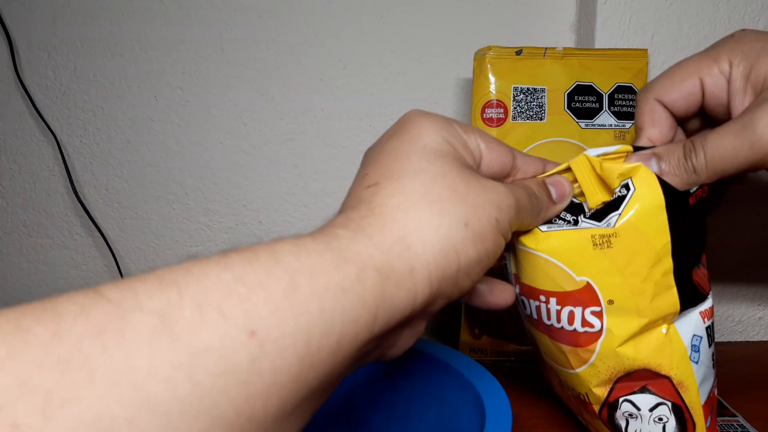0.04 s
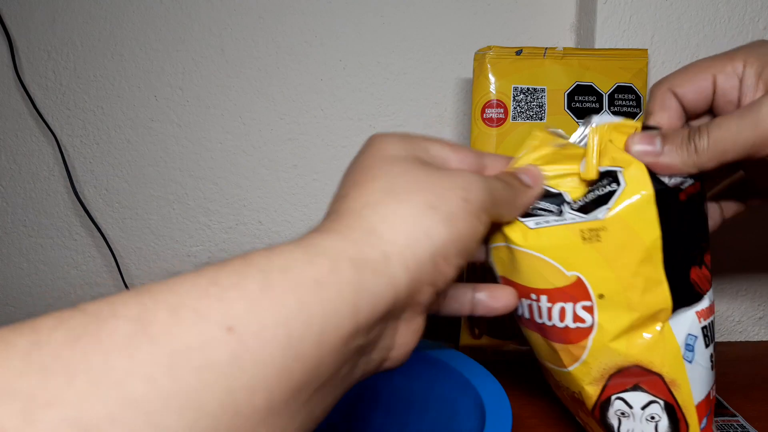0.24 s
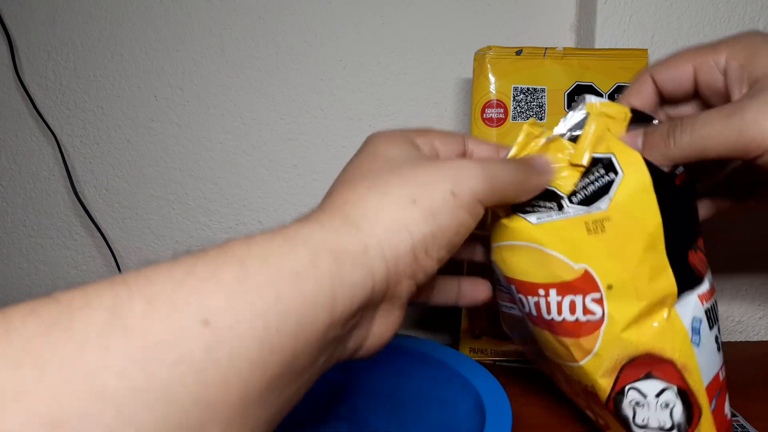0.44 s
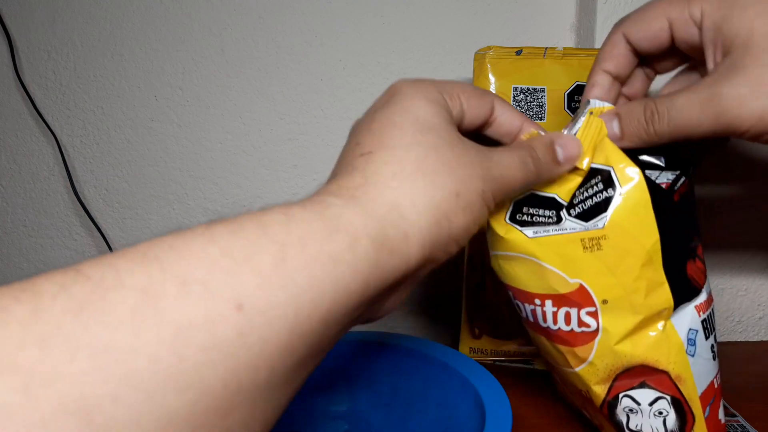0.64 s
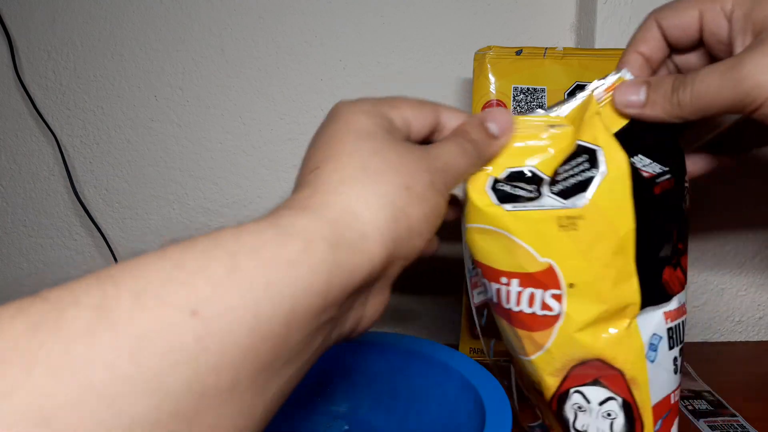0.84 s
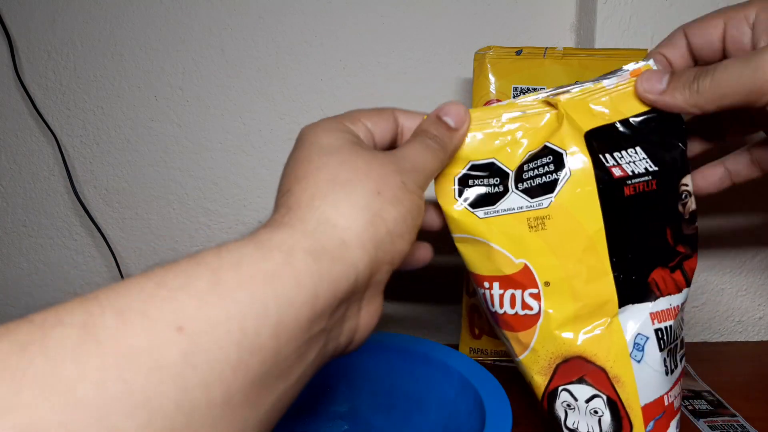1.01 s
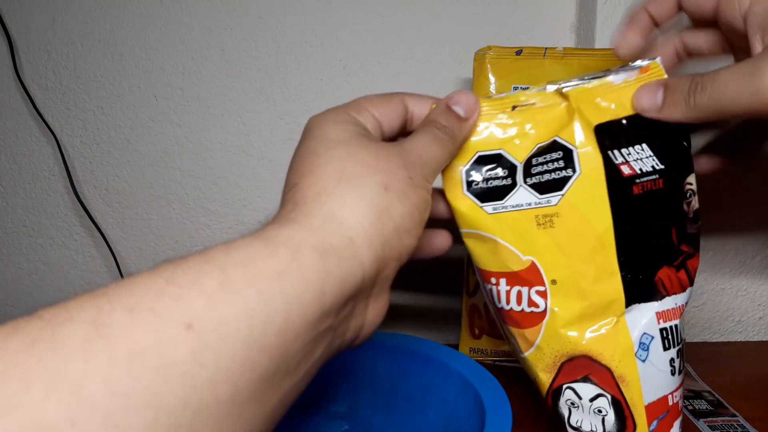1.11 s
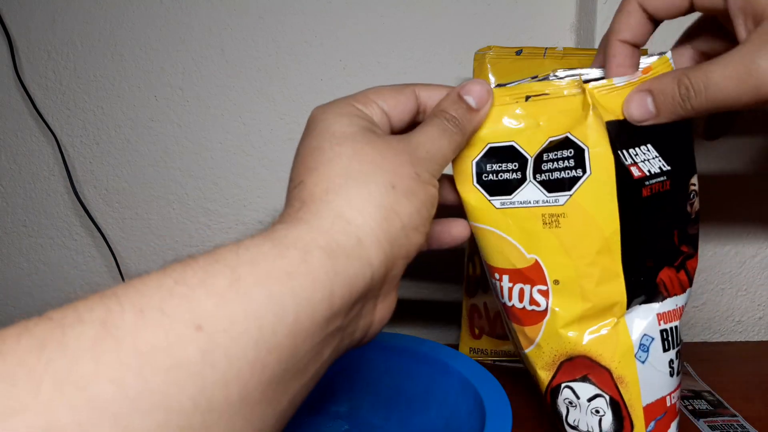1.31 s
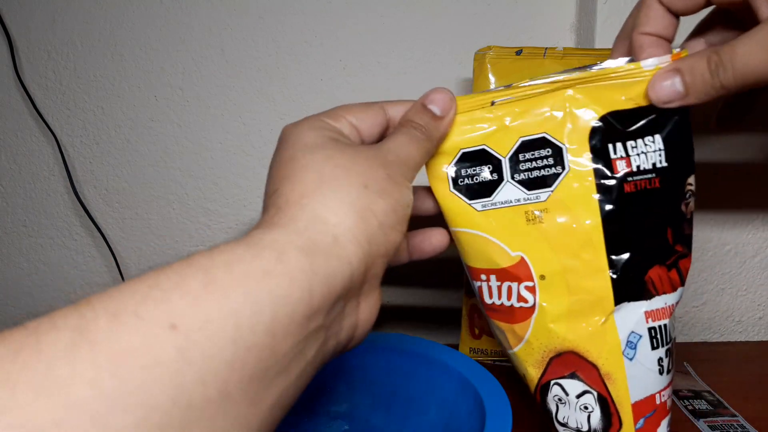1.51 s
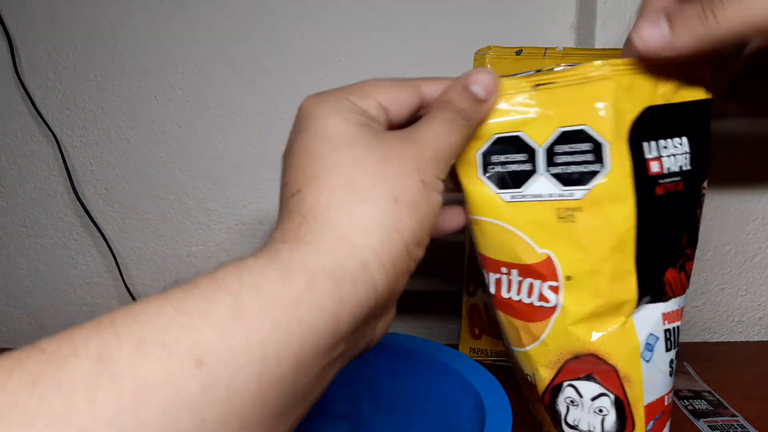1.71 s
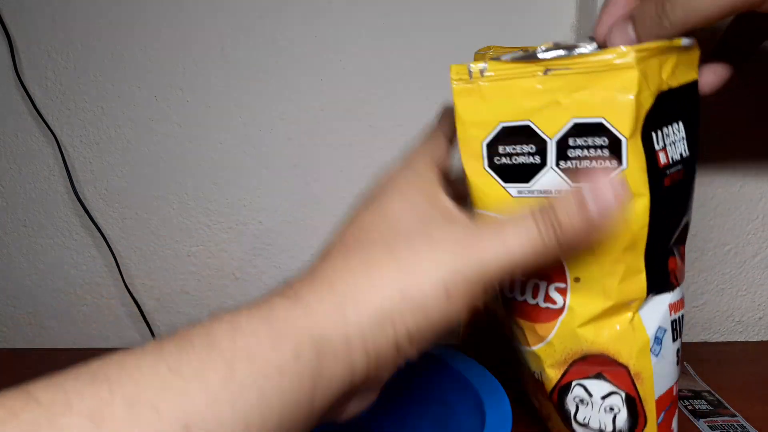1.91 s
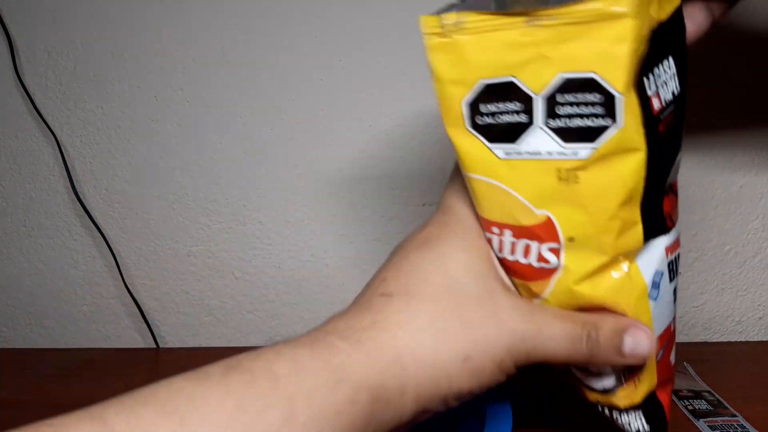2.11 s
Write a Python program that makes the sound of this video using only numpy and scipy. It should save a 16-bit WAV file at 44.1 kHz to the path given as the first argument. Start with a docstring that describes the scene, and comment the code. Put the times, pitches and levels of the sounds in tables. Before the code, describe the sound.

A foil snack bag is pulled open by hand, close and dry in a small room. A brief soft rip with a dull thump comes at 0.1 seconds, then a dense, loud hissing rip at 0.3. Crinkles and hollow pops follow until a crackling rip with bright snaps at 0.8-1.05. Quieter rustling leads to sharp snaps near 1.5 and 2.0, over faint low rumble.

```python
"""Three dense, hissing rips, bright snaps and hollow pops: two hands pull open a foil snack bag close by, in a
small room. The peeling seam is a stream of tiny clicks that ring the film; creases, cracks and popping panels
are short bursts of gritty noise, and crumpling is decaying noise grains. Dull puffs of air are dying sine
tones; a low rumble of filtered noise from the shifting hands lies underneath."""
import sys
import numpy as np
from scipy import signal
from scipy.fft import rfft, irfft
from scipy.io import wavfile

SR = 44100
rng = np.random.default_rng(int(sys.argv[2]) if len(sys.argv) > 2 else 0)


def pcm_store(signal):
    """Save signal as 16-bit PCM."""
    levels = np.round(np.clip(np.atleast_2d(signal), -1, 1) * 32767)
    wavfile.write(sys.argv[1], SR, levels.astype(np.int16).T)


N = 94815
TIME = np.arange(N) / SR

# Spectrum of snapping film: (frequency [Hz], relative level [dB])
FILM_SPECTRUM = [(300, -37), (1200, -6), (1900, -15.5), (2700, -8.5), (3400, 1.6), (5400, 1.5), (7000, 3),
                 (8500, 0.5), (10500, -2.5), (13000, -2), (16000, -8)]
# Spectrum of the hollow body of the bag: (frequency [Hz], relative level [dB])
BODY_SPECTRUM = [(60, -7), (185, -2.5), (310, 2.5), (420, -1), (540, 3), (640, -3.5), (760, 0.5),
                 (1020, -6.5), (1350, -1), (1900, -12), (3000, -9), (8000, -47)]
BODY_RISE_S = 0.0005


def from_db(db):
    """Decibels to gain."""
    return 10 ** (np.asarray(db) / 20)


def rms_one(x):
    """Scale to unit rms."""
    return x / np.sqrt(np.mean(x ** 2) + 1e-20)


def unit_snap(x):
    """Scale a burst so that its energy equals unit rms over 5 ms."""
    span_s = 0.005
    return x / np.sqrt(np.sum(x ** 2) / (span_s * SR))


def add(out, s, sound):
    """Mix a sound in at a time in seconds."""
    start = max(int(s * SR), 0)
    out[start:start + len(sound)] += sound[:max(N - start, 0)]


def colour(x, spectrum, tilt_db=0, size=2048):
    """Causal (minimum-phase) filter with the given spectrum, tilted in dB per octave."""
    tilt_pivot_hz = 5000
    hz, db = np.transpose(spectrum)
    f = np.maximum(np.arange(size // 2 + 1) * SR / size, 1)
    # The tilt levels off one octave below the pivot and two above
    octaves = np.clip(np.log2(f / tilt_pivot_hz), -1, 2)
    level = np.interp(np.log(f), np.log(hz), db) + tilt_db * octaves
    # Folding the cepstrum onto positive time makes the filter minimum-phase
    cepstrum = irfft(np.log(from_db(level)))[:size // 2]
    cepstrum[1:] *= 2
    impulse = irfft(np.exp(rfft(cepstrum, size)))
    return signal.fftconvolve(x, impulse)[:len(x)]


def even(x, span_s):
    """Hold the short-term rms near one, using a smooth window twice the span long."""
    window = signal.windows.hann(int(2 * span_s * SR) + 1)
    power = signal.fftconvolve(x ** 2, window / window.sum(), "same")
    return x / np.sqrt(np.abs(power) + 1e-12)


def resonance(x, hz, width_hz):
    """A two-pole band-pass with a gain of about one at its centre."""
    r = np.exp(-np.pi * width_hz / SR)
    zeros = (1 - r * r) / 2 * np.array([1, 0, -1])
    poles = [1, -2 * r * np.cos(2 * np.pi * hz / SR), r * r]
    return signal.lfilter(zeros, poles, x)


def clicks(per_s, spread_db):
    """Random clicks, mostly small, a few larger, by an exponential spread in dB."""
    sizes = from_db(spread_db * np.minimum(rng.exponential(1, N), 5))
    return sizes * (rng.random(N) < per_s / SR)


def grains(per_s, spread_db, decay_s):
    """Random tiny buckles, each a brief dying flutter of the film."""
    keep = np.exp(-1 / (decay_s * SR))
    envelope = signal.lfilter([1], [1, -keep], clicks(per_s, spread_db) + 1e-9)
    return envelope * rng.standard_normal(N)


def flutter(rise_s, decay_s, size=2048):
    """The gritty, quickly dying shudder of one buckle."""
    grit_spread = 0.43
    t = np.arange(size) / SR
    # The noise jumps to a new random loudness every 16 samples
    loudness = np.exp(grit_spread * np.repeat(rng.standard_normal(size // 16), 16))
    grit = rng.standard_normal(size) * loudness
    return grit * (1 - np.exp(-t / rise_s)) * np.exp(-t / decay_s)


def facets(count=48):
    """Breaks land on facets of every size, each ringing briefly at its own pitch."""
    per_s, spread_db, width_hz = 1200, 1.5, 94
    breaks = clicks(per_s, spread_db) * rng.choice([-1, 1], N)
    dealt = rng.integers(0, count, N)
    pitches_hz = np.linspace(2400, 12000, count) * rng.uniform(.98, 1.02, count)
    return sum(resonance(breaks * (dealt == k) + 1e-18, hz, width_hz) for k, hz in enumerate(pitches_hz))


def tearing(spectrum):
    """A dense stream of tiny breaks with ringing facets among them, held near unit level."""
    per_s, spread_db, even_s = 9000, 2.5, 0.016
    facet_db = -2.5  # relative to the breaks, before colouring
    breaks = clicks(per_s, spread_db) * rng.choice([-1, 1], N)
    mix = rms_one(breaks) + from_db(facet_db) * rms_one(facets())
    return even(colour(mix, spectrum), even_s)


def seam():
    """The glue lets go in thousands of tiny breaks a second, which ring the film and hiss on top."""
    # The seam peels, one curve per rip: (time [s], level [dB], top hiss relative to level [dB])
    rips = [
        [(.085, -58, -13), (.104, -36.5, -0.5), (.13, -37.5, -1.5), (.16, -35.5, 2), (.185, -41.5, 1),
         (.205, -58, 14)],
        [(.26, -47, 0), (.283, -31, 4), (.31, -23.5, -3.5), (.325, -22.5, 2.5), (.346, -28, 9), (.354, -33, 11),
         (.362, -41, -7)],
        [(.80, -49, -1), (.822, -36, -2), (.85, -54, 0), (.89, -40.5, -2), (.925, -30.5, 0.5),
         (.955, -28.5, -9.5), (.98, -34.5, 2.5), (1.036, -36, -12), (1.062, -48, -12)],
    ]
    # Spectrum of the peeling seam: (frequency [Hz], relative level [dB])
    seam_spectrum = [(300, -19), (1300, -6.5), (1900, -10), (2800, -6), (3350, -0.3), (5200, -4.5),
                     (7000, -0.5), (8500, -6), (10500, -17), (16000, -27)]
    # Spectrum of its top hiss: (frequency [Hz], relative level [dB])
    hiss_spectrum = [(2000, -23.5), (7000, -8), (10400, 0), (11800, -5), (13500, -0.5), (16000, -4)]
    ring, hiss = tearing(seam_spectrum), tearing(hiss_spectrum)
    out = np.zeros(N)
    for rip in rips:
        s, db, hiss_db = np.transpose(rip)
        gain = from_db(np.interp(TIME, s, db, -np.inf, -np.inf))  # silent outside the rip
        hiss_gain = from_db(np.interp(TIME, s, hiss_db))
        out += gain * (ring + hiss_gain * hiss)
    return out


def cracks():
    """A stretched facet of film flips with a sharp crack and rings at its own pitch."""
    # Taut film lets go: (time [s], level [dB], ring pitch [Hz])
    crack_table = [(0.1134, -25, 3300), (0.2913, -22.5, 3580), (.396, -35, 3420), (.471, -37, 6200),
                   (0.8728, -32, 7000), (0.8945, -22.5, 6500), (0.9197, -21, 7200), (0.949, -24.5, 7850),
                   (0.965, -22.5, 5860), (1.4511, -32.5, 6300), (1.571, -43, 3400), (1.676, -44.5, 3300),
                   (1.727, -42, 6670), (1.778, -43, 6650), (1.999, -37, 7800), (2.002, -21.5, 4920),
                   (2.0028, -24.5, 7900), (2.007, -35, 5170), (2.0126, -23, 7770), (2.082, -33.5, 5270)]
    rise_s, decay_s, tilt_db_per_octave = 0.00004, 0.0032, -3
    ring_db, ring_width_hz = 11, 640
    out = np.zeros(N)
    for s, db, hz in crack_table:
        film = colour(flutter(rise_s, decay_s), FILM_SPECTRUM, tilt_db_per_octave)
        ring = from_db(ring_db) * resonance(film, hz, ring_width_hz)
        add(out, s, from_db(db) * unit_snap(film + ring))
    return out


def snaps():
    """Each crease gives a bright snap and a slower, hollow knock of the whole bag."""
    # A crease snaps: (time [s], level before trims [dB], hollow body relative to level, before
    # its trim [dB], brightness tilt [dB per octave])
    snap_table = [(.031, -38.5, -1.5, -5), (0.2229, -35, -5, -15.5), (.250, -37.5, -11, 5),
                  (0.265, -30.5, -7, 1), (0.3694, -36, 0, -26), (.433, -30, -1.5, 3), (.486, -34, -21, 8),
                  (0.557, -37, 2.5, 8), (0.608, -39, 0, -5.5), (.630, -43, 8.5, -6.5),
                  (.672, -42, -19, 1.5), (0.7019, -39.5, 3.5, -7), (0.75, -35, -4, -5),
                  (0.7825, -34, -5, -9), (0.8139, -27.5, -4, -5.5), (0.853, -33, -11, 2.5),
                  (0.909, -25.5, -13, -5), (1.034, -27, -14, -5.5), (1.108, -39, -4, -7),
                  (1.205, -41.5, -15, -2.5), (1.2348, -33.5, -1, -6.5), (1.361, -44, 0.5, -5),
                  (1.383, -52.5, 9.5, -9), (1.3989, -39, 3, -5.5), (1.414, -47, -4, -17),
                  (1.4455, -36, -3, -7.5), (1.483, -33.5, -9, -8.5), (1.4919, -37, -2, -1),
                  (1.5141, -19, -22, -4.5), (1.544, -34, -3.5, -4.5), (1.6092, -28.5, -14, -1.5),
                  (1.85, -38, -7, -1.5), (1.911, -40.5, -5, 1), (1.9341, -40.5, -9, -1),
                  (2.0194, -40.5, 2, 7), (2.033, -39.5, -3, -11), (2.11, -35, -6.5, -10.5),
                  (2.138, -43.5, -14, -8)]
    rise_s, soft_decay_s, body_decay_s = 0.0005, 0.0037, 0.008
    snap_trim_db, body_trim_db = 0.5, 1
    # Harder snaps die sooner: the decay shrinks by a share of their excess level
    soft_snap_db, quickening = -35, 0.19
    out = np.zeros(N)
    for s, db, body_db, tilt_db in snap_table:
        decay_s = soft_decay_s * from_db(quickening * min(soft_snap_db - db, 0))
        snap = unit_snap(colour(flutter(rise_s, decay_s), FILM_SPECTRUM, tilt_db))
        knock = unit_snap(colour(flutter(BODY_RISE_S, body_decay_s), BODY_SPECTRUM))
        add(out, s, from_db(db + snap_trim_db) * snap)
        add(out, s, from_db(db + body_db + body_trim_db) * knock)
    return out


def pops():
    """Short, dry, hollow pops; the larger the panel, the lower its note."""
    # A panel of the bag wall pops through: (time [s], level [dB], pitch [Hz])
    pop_table = [(.291, -32, 680), (.436, -36, 560), (.5, -35, 327), (.515, -35, 580), (.633, -40.5, 1340),
                 (.702, -37.5, 1480), (.774, -32.5, 456), (.806, -32.5, 1210), (1.145, -39, 750),
                 (1.171, -41, 1410), (1.515, -34.5, 770), (1.69, -42, 725), (2.11, -38, 387),
                 (2.119, -39.5, 1300)]
    decay_s = 0.0037
    width_hz = 310  # of each of the two band-passes in a row
    out = np.zeros(N)
    for s, db, hz in pop_table:
        pop = resonance(flutter(BODY_RISE_S, decay_s), hz, width_hz)
        pop = resonance(pop, hz, width_hz)
        add(out, s, from_db(db) * unit_snap(pop))
    return out


def handling():
    """Fingers work the bag: fine crinkles in the film, hollow crumpling of its walls."""
    # Handling of the bag: (time [s], fine crinkle level [dB], hollow crumple level [dB])
    handling_curve = [(0, -48.5, -49), (.055, -57.5, -58), (.10, -37, -41.5), (.21, -52.5, -52.5),
                      (.255, -40.5, -44.5), (.29, -37, -34.5), (.345, -34.5, -36), (.40, -36.5, -47),
                      (.47, -41, -42), (0.521, -35, -40.5), (.60, -53.5, -62), (0.734, -57.5, -54),
                      (0.768, -41, -42), (.83, -42, -40), (.88, -46.5, -45), (1.002, -37.5, -33),
                      (1.09, -49, -50.5), (1.19, -57.5, -51.5), (1.32, -63.5, -57), (1.50, -50.5, -47.5),
                      (1.535, -42.5, -47.5), (1.59, -55.5, -51.5), (1.668, -68, -56), (1.715, -49, -46.5),
                      (1.83, -48, -43), (1.89, -65, -50.5), (1.94, -53, -50.5), (1.995, -69, -68),
                      (2.02, -58, -51), (2.07, -61, -47), (2.15, -54, -47.5)]
    # Spectrum of the fine crinkle: (frequency [Hz], relative level [dB])
    crinkle_spectrum = [(500, -17), (1900, -4.5), (3400, 4), (7000, 4.5), (8500, 1.5), (16000, -8)]
    even_s = 0.016
    s, crinkle_db, crumple_db = np.transpose(handling_curve)
    crinkle_grains = grains(per_s=650, spread_db=2.5, decay_s=0.0027)
    crumple_grains = grains(per_s=200, spread_db=0.1, decay_s=0.0053)
    crinkle = even(colour(crinkle_grains, crinkle_spectrum), even_s)
    crumple = even(colour(crumple_grains, BODY_SPECTRUM), even_s)
    crinkle_gain = from_db(np.interp(TIME, s, crinkle_db))
    crumple_gain = from_db(np.interp(TIME, s, crumple_db))
    return crinkle_gain * crinkle + crumple_gain * crumple


def puffs():
    """The bag flexes and puffs out air: a low sine that dies within a few swings at most."""
    # The bag flexes: (time [s], level [dB], pitch [Hz], decay [s])
    puff_table = [(0.125, -17.5, 127, 0.0027), (0.13, -27, 49.4, 0.025), (0.631, -37, 122, 0.013),
                  (1.279, -24, 98, 0.0069), (2.013, -33, 96, 0.011)]
    out = np.zeros(N)
    for s, db, hz, decay_s in puff_table:
        swing = np.sin(2 * np.pi * hz * TIME) * np.exp(-TIME / decay_s)
        add(out, s, from_db(db) * swing)
    return out


def room(x):
    """A short diffuse tail of decaying noise whose treble dies first."""
    # Colour of the room: (frequency [Hz], relative level [dB])
    room_spectrum = [(100, 3), (2000, 2), (7000, -1), (11000, 0), (16000, 3.5)]
    tail_db = -13  # tail energy before colouring
    low_t60_s, top_t60_s, onset_s = 0.21, 0.16, 0.0026
    t = TIME[:SR // 2]
    white = rng.standard_normal(len(t))
    low = signal.sosfilt(signal.butter(1, 6000, fs=SR, output="sos"), white)
    top = white - low
    tail = low * from_db(-60 * t / low_t60_s) + top * from_db(-60 * t / top_t60_s)
    tail *= t > onset_s
    tail = colour(tail / np.sqrt(np.sum(tail ** 2)), room_spectrum)
    return from_db(tail_db) * signal.fftconvolve(x, tail)[:N]


def rumble():
    """Low rumble of the hands shifting on the bag: filtered noise that slowly eases."""
    # Spectrum of the rumble: (frequency [Hz], relative level [dB])
    rumble_spectrum = [(15, 4), (40, -1.5), (92, -1.5), (140, -10), (300, -8), (700, -23.5), (16000, -68)]
    middle_db, fade_db_per_s = -47.5, 1  # level halfway through, and its fall
    db = middle_db - fade_db_per_s * (TIME - TIME.mean())
    # One extra second lets the filter settle
    noise = colour(rng.standard_normal(N + SR), rumble_spectrum, size=8192)[SR:]
    return from_db(db) * rms_one(noise)


def scene():
    """The bag with its room tail, the dry puffs and the rumble, in one channel."""
    bag = seam() + cracks() + snaps() + pops() + handling()
    return (bag + room(bag) + puffs() + rumble())[None]


def record(dry):
    """A steep elliptic low-pass cuts the top."""
    cutoff_hz = 15650
    return signal.sosfilt(signal.ellip(10, .2, 80, cutoff_hz, fs=SR, output="sos"), dry)


dry = scene()
out = record(dry)
pcm_store(out)
```